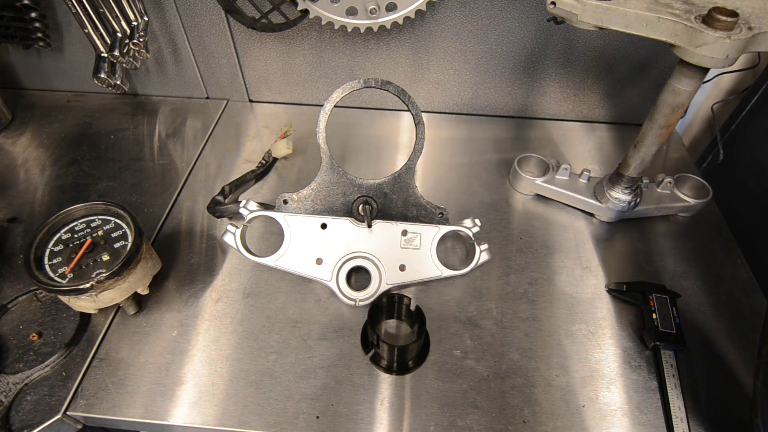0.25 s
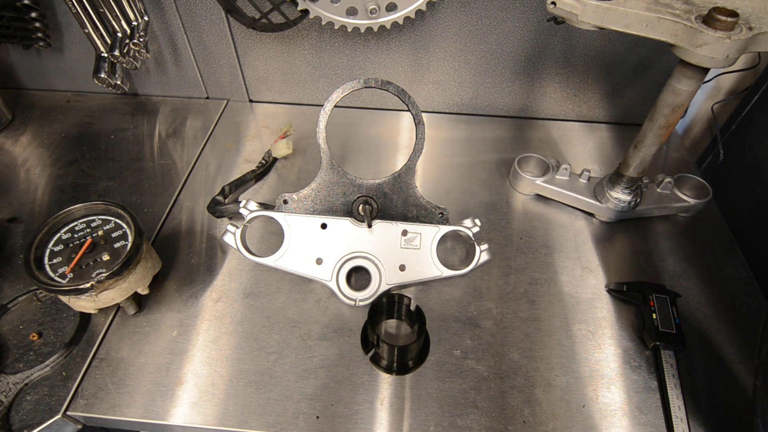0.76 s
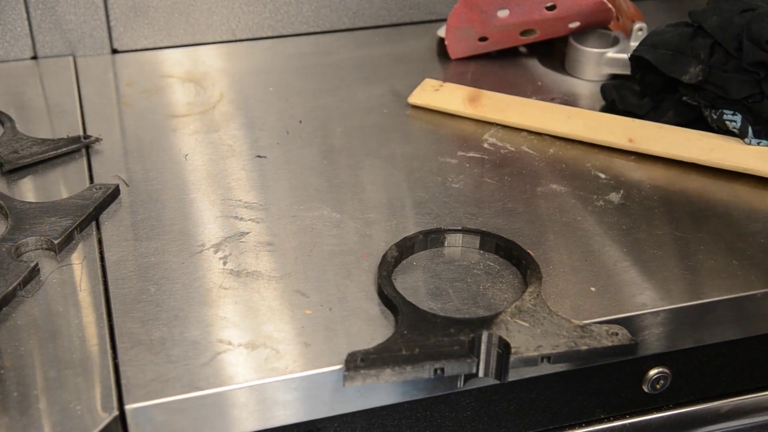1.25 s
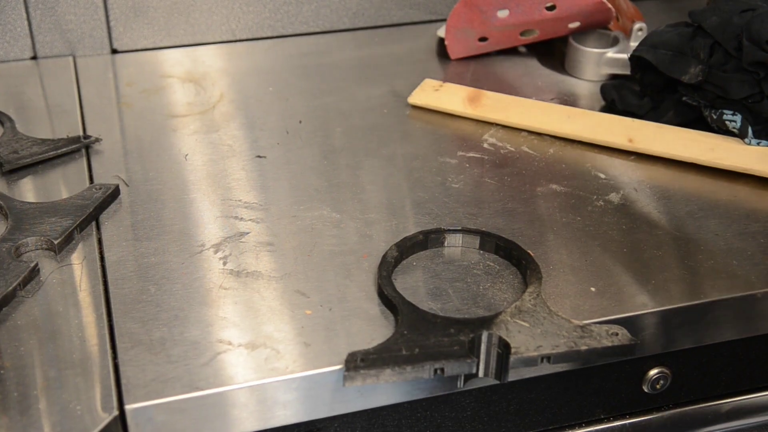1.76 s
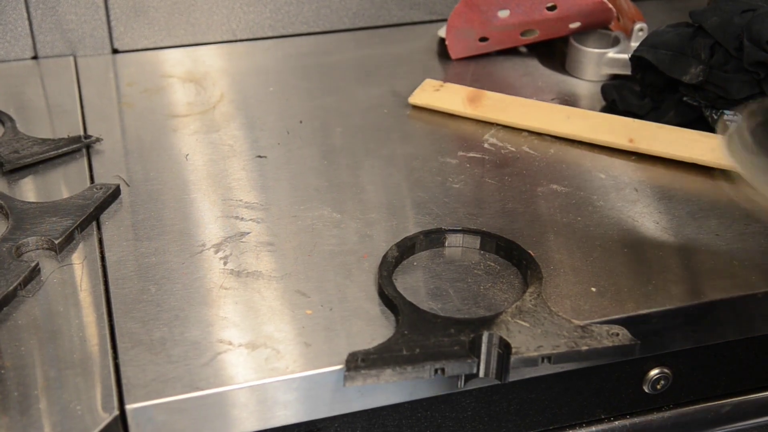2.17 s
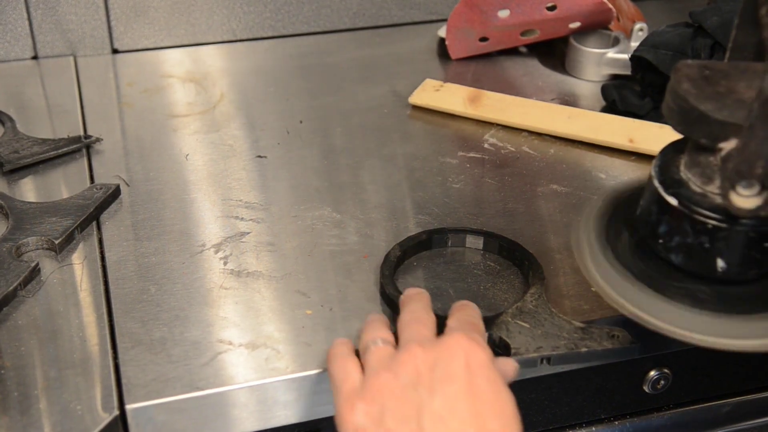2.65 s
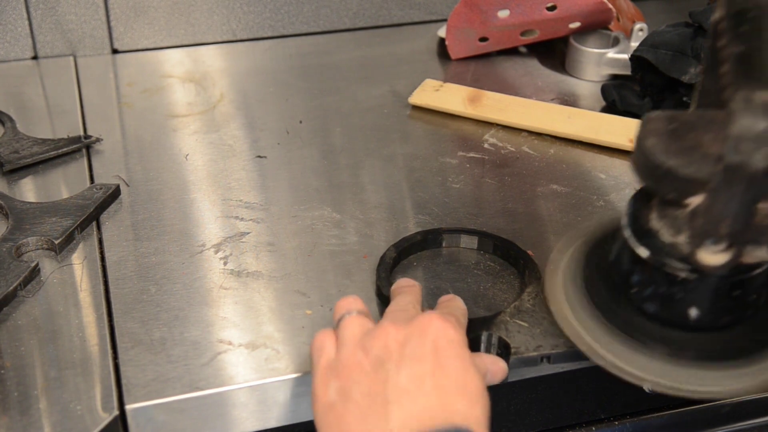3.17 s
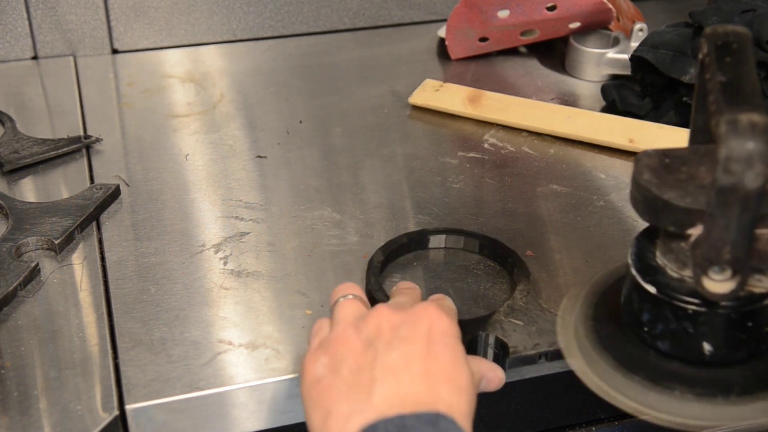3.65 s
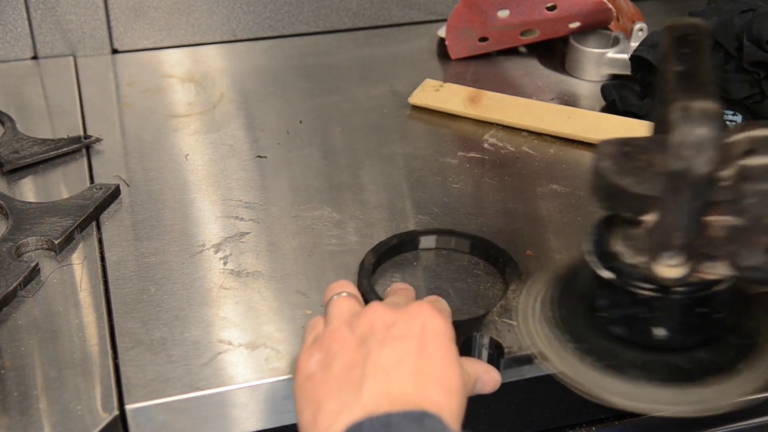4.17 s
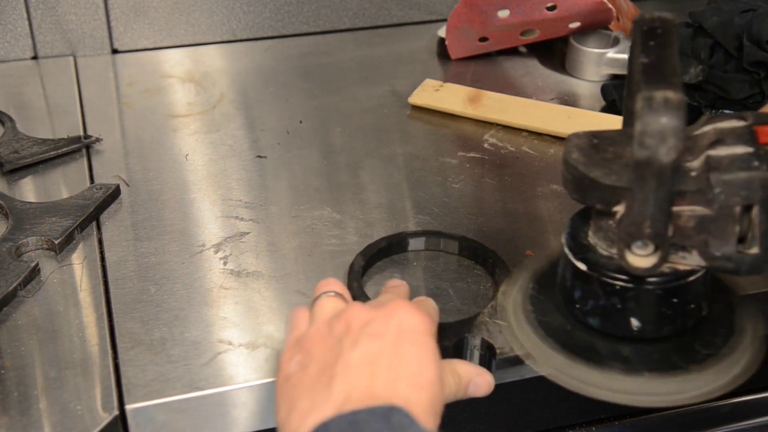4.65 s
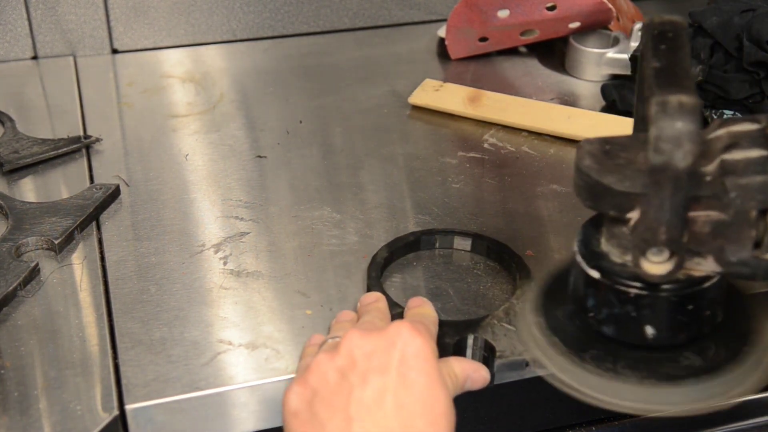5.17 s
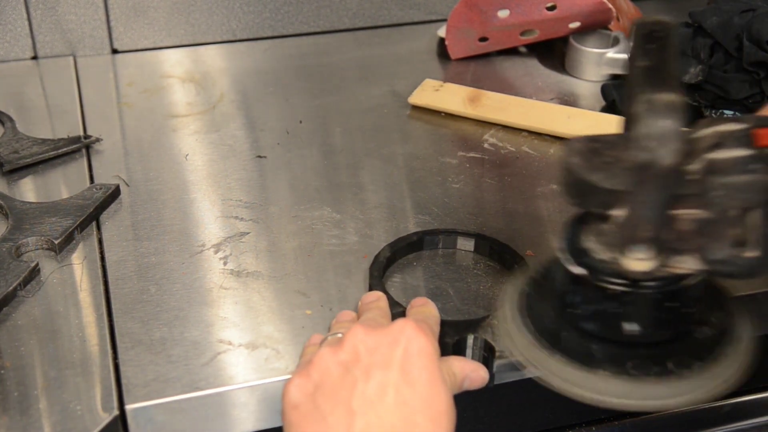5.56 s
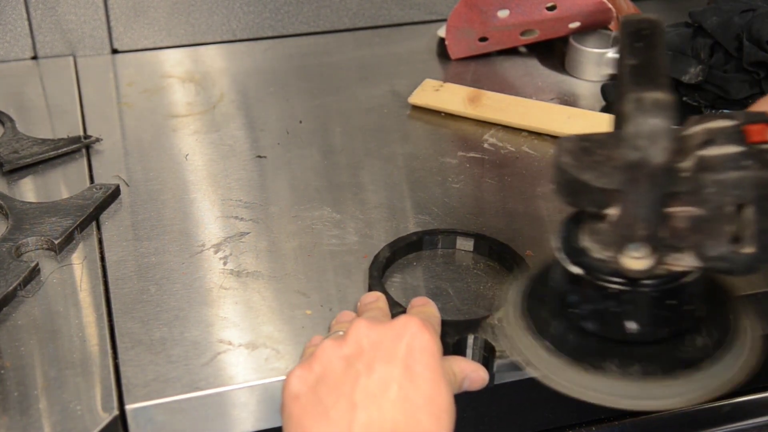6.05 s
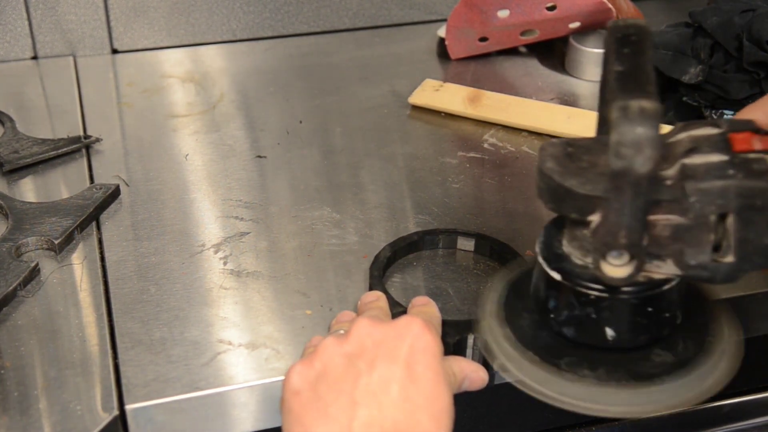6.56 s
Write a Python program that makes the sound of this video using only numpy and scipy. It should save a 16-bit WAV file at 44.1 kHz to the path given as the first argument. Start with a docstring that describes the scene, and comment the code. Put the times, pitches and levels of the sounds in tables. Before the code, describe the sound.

Near silence with faint room tone and a small clack, then a few knocks as an electric sander comes in abruptly, turning slowly with a coarse gear rattle. Heavy thuds on the steel bench follow while its whine and hiss climb to full speed. The disc then scrapes a plastic part, drumming through the bench, and the motor dips slightly as it is pressed harder. Close microphone, small hard workshop.

```python
"""Over faint room tone a geared electric disc sander is knocked about on a steel bench: thuds and clacks.
It comes in abruptly, already turning slowly: random tooth strikes ring the housing, with whine, whistle, hiss.
Near full speed the rattle throbs with each turn of the disc, and the disc's unbalance hums.
Set against a plastic part, the disc scrapes (shaped noise) and drums bench and part (tones locked to its turn).
At last the hand leans on the tool: the motor sags and the drumming moves from the bench into the part."""
import sys
import numpy as np
from scipy import signal
from scipy.fft import rfft, irfft
from scipy.io import wavfile
from scipy.ndimage import uniform_filter1d

SR = 44100
rng = np.random.default_rng(int(sys.argv[2]) if len(sys.argv) > 2 else 0)


def transcribe(signal):
    """Save signal, clipped to [-1, 1], as a 16-bit WAV file at the path in sys.argv[1]."""
    frames = np.atleast_2d(signal).T
    limited = np.clip(frames, -1, 1)
    pcm = np.round(limited * 32767).astype(np.int16)
    wavfile.write(sys.argv[1], SR, pcm)


N = 300321
TIME = np.arange(N) / SR
PINION_TEETH, WHEEL_TEETH = 12, 45  # the motor shaft carries the pinion, the disc the wheel
ENTRY_S = 0.841  # the sander comes in, already turning slowly
FULL_MESH_HZ = 1965  # teeth meeting per second at the governed speed


def gain_of(db):
    """Decibels to amplitude."""
    return 10 ** (np.asarray(db) / 20)


def evened(x):
    """Scales to rms 1."""
    return x / np.sqrt(np.mean(x ** 2) + 1e-20)


def bump(x, middle, width):
    """A bell of height 1, down to 1/e at one width."""
    return np.exp(-((x - middle) / width) ** 2)


def read(points, hz, column=1):
    """One column of a spectrum on a log-frequency axis."""
    points = np.asarray(points)
    return np.interp(np.log(hz + 1), np.log(points[:, 0]), points[:, column])


def band_rms(x, low_hz, high_hz):
    """Rms of the part of x inside a band."""
    hz = np.fft.rfftfreq(len(x), 1 / SR)
    inside = rfft(x)[(hz > low_hz) & (hz < high_hz)]
    return np.sqrt(2 * np.sum(abs(inside) ** 2)) / len(x)


def noise(colour):
    """Steady noise of a given spectrum, rms 1."""
    hz = np.fft.rfftfreq(N, 1 / SR)
    return evened(irfft(rfft(rng.standard_normal(N)) * gain_of(read(colour, hz)), N))


def wander(rate_hz):
    """Slow chance up to about a rate, rms 1."""
    hz = np.fft.rfftfreq(N, 1 / SR)
    return evened(irfft(rfft(rng.standard_normal(N)) * np.exp(-(hz / rate_hz) ** 2), N))


# room tone spectrum, relative: freq_hz, level_db
ROOM_COLOUR = [(24, -63), (40, -10), (100, -10), (346, -8), (466, -1.5), (627, -8), (710, -7), (1110, -6.5),
               (1490, -10.5), (1730, -8), (1870, -10.5), (2710, -17), (5290, -30), (12600, -38),
               (15000, -39)]


def room_tone(level_db=-61):
    """Steady coloured noise under everything."""
    return gain_of(level_db) * noise(ROOM_COLOUR)


# bench-top thud spectrum, relative: freq_hz, level_db
THUD_COLOUR = [(30, -25), (90, -28), (200, -1), (400, 0), (800, 1), (1500, -2), (4000, -17), (12000, -71)]
# handling knocks, and last the disc striking the part: start_s, thud_db, clack_db, clack_pitch_hz,
# clack_width_octaves, clack_t60_s
KNOCKS = [(0.033, -80, -47.5, 2450, 0.37, 0.032), (0.627, -57, -68, 3500, 0.98, 0.28),
          (0.679, -59, -70, 3500, 0.8, 0.2), (0.839, -42.5, -52, 2900, 0.6, 0.044),
          (0.875, -52, -49, 4990, 0.36, 0.045), (0.912, -42, -46, 5000, 0.31, 0.08),
          (1.254, -25.5, -40, 6200, 0.72, 0.13), (1.287, -40, -54, 3000, 0.8, 0.08),
          (1.338, -26.5, -46, 2500, 0.72, 0.091), (1.385, -36, -51, 2480, 0.8, 0.08),
          (1.431, -39, -37.5, 5400, 0.74, 0.095), (3.446, -51, -40, 9700, 0.39, 0.38)]


def knocks(thud_t60_s=0.31, thud_attack_s=0.0012, clack_attack_s=0.001, size=22050):
    """Each knock is a dull thud of the bench top and a bright, dense clack, both decaying noise."""
    out, t, hz = np.zeros(N), TIME[:size], np.fft.rfftfreq(size, 1 / SR)
    bench = noise(THUD_COLOUR)
    for start_s, thud_db, clack_db, pitch_hz, octaves, clack_t60_s in KNOCKS:
        start = round(start_s * SR)
        span = slice(start, start + size)
        band = np.exp(-.5 * (np.log2((hz + 1) / pitch_hz) / octaves) ** 2)
        clack = evened(irfft(rfft(rng.standard_normal(size)) * band))
        clack_shape = np.exp(-np.log(1000) * t / clack_t60_s) * (1 - np.exp(-t / clack_attack_s))
        thud_shape = np.exp(-np.log(1000) * t / thud_t60_s) * (1 - np.exp(-t / thud_attack_s))
        out[span] += clack * gain_of(clack_db) * clack_shape
        out[span] += bench[span] * gain_of(thud_db) * thud_shape
    return out


def workshop(x, wet_db=-9, t60_s=0.38, gap_s=.003, size=16000):
    """Scattered reflections from the bench and the near walls: sparse random taps that die away."""
    t = TIME[:size]
    sparse = rng.standard_normal(size) * (rng.random(size) < .05)
    taps = sparse * np.exp(-np.log(1000) * t / t60_s) * (t > gap_s)
    wet = gain_of(wet_db)
    echoes = signal.oaconvolve(x, taps / np.linalg.norm(taps))[:N]
    return (x + wet * echoes) / np.sqrt(1 + wet ** 2)


TOUCH_S, SETTLE_S = 3.43, 0.37  # the disc meets the part, then settles onto it


def touching():
    """How fully the disc lies on the part, 0-1."""
    return np.clip((TIME - TOUCH_S) / SETTLE_S, 0, 1)


def leaning(middle_s=5.9, ease_s=0.19):
    """How hard the hand presses down, 0-1: a smooth step."""
    return 1 / (1 + np.exp((middle_s - TIME) / ease_s))


def speed(crawl_hz=250, climb_hz_per_s=740, knee=10, sag_hz=97):
    """Teeth meeting per second: a steady climb rounds off at the governed speed; pressure drags it down."""
    climb = crawl_hz + climb_hz_per_s * np.maximum(TIME - ENTRY_S, 0)
    governed = climb / (1 + (climb / FULL_MESH_HZ) ** knee) ** (1 / knee)
    return governed - sag_hz * leaning()


def decades(mesh_hz):
    """Speed against full speed, in powers of ten."""
    return np.log10(mesh_hz / FULL_MESH_HZ)


def gear_level(mesh_hz, full_db=-21.5, db_per_decade=13.5, unsteady_db=0.65):
    """Gear loudness in dB: rises quickly from its abrupt entry, grows with speed and load, never quite still."""
    free = full_db + db_per_decade * decades(mesh_hz)
    # the gears shake harder while their rate climbs past the housing's main resonances
    free += 2 * bump(mesh_hz, middle=1520, width=110)
    load_rise_s, touch_db, lean_db = 1.0, 1.5, 1
    load = touch_db * np.clip((TIME - TOUCH_S) / load_rise_s, 0, 1) + lean_db * leaning()
    entry_lull = -4 * bump(TIME, ENTRY_S, width=0.043)
    # first contact takes up the play in the gears and calms them for a moment
    calm = -1 * bump(TIME, TOUCH_S + 0.12, width=0.12)
    return free + load + entry_lull + calm + unsteady_db * wander(rate_hz=15)


# housing resonances: centre_hz, width_hz, lift_slow_db, lift_full_speed_db
HOUSING_MODES = [(401, 155, 9.5, 5.1), (506, 7.8, 13, -3), (712, 38, 1.5, 8.5), (1002, 58, -1.5, 7.5),
                 (1201, 210, 12, 9.5), (1326.5, 71, 8, 13), (1446, 24, 6, 3), (1753, 250, 8.5, 13),
                 (2027, 120, 9, 4.5), (2271, 160, 12, 9), (2395, 153, 2.5, 6.5), (2690, 300, 5, 4),
                 (2696, 500, 7.5, 6), (2860, 42, 1.5, 0), (3244, 200, -2.5, 6.5), (3576, 116, 2, 8),
                 (3790, 205, -1, 9), (4110, 150, -0.5, 6), (4860, 210, 1, 6.5), (5390, 190, 6, 12.5),
                 (5880, 155, 9, 13)]
# broad housing colour, relative: freq_hz, level_slow_db, level_full_speed_db
HOUSING_COLOUR = [(30, -38, -75), (80, -37, -39), (145, -37, -28), (202, -19, -24), (354, -15.5, -17),
                  (604, -11.5, -7), (960, -6, -9), (1457, -4, -6), (2500, -19.5, -12), (3230, -14, -15.5),
                  (4500, -17.5, -15), (5450, -30, -29.5), (7230, -34.5, -29), (10000, -45, -53),
                  (15000, -52, -62)]


def housing(x, column, size=8192):
    """Rings the housing: a minimum-phase filter of broad colour plus resonances, rms 1 in 1-3 kHz."""
    hz = np.fft.rfftfreq(size, 1 / SR)
    db = read(HOUSING_COLOUR, hz, column)
    for mode in HOUSING_MODES:
        centre_hz, width_hz, lift_db = mode[0], mode[1], mode[1 + column]
        db = db + lift_db / (1 + (2 * (hz - centre_hz) / width_hz) ** 2)
    # folding the cepstrum makes the filter causal
    cepstrum = irfft(np.log(gain_of(db)))
    cepstrum[1:size // 2] *= 2
    cepstrum[size // 2 + 1:] = 0
    response = irfft(np.exp(rfft(cepstrum)))[:size // 2]
    rung = signal.oaconvolve(x, response)[:N]
    return rung / band_rms(rung, 1000, 3000)


def throb(teeth, disc_db, shaft_db, current_db, current_hz=100):
    """Load on the teeth in dB: swings with the disc, the motor shaft and the pulsing mains current."""
    disc = disc_db * np.cos(2 * np.pi * teeth / WHEEL_TEETH)
    shaft = shaft_db * np.cos(2 * np.pi * teeth / PINION_TEETH)
    return disc + shaft + current_db * np.cos(2 * np.pi * current_hz * TIME)


def backlash(teeth, settle_s=0.0048, scatter_s=.002, slap_share=.7, slap_size=1.55):
    """On some shaft turns the teeth slap across their play, hardest where the disc runs heavy."""
    at = np.flatnonzero(np.diff(teeth // PINION_TEETH))
    size, happens, late = rng.random((3, len(at)))
    heavy = 1 + np.cos(2 * np.pi * teeth[at] / WHEEL_TEETH)
    slaps = np.zeros(N)
    slap_at = (at + late * SR * scatter_s).astype(int).clip(0, N - 1)
    slaps[slap_at] = (happens < slap_share) * slap_size * size * heavy
    return signal.lfilter([1], [1, -np.exp(-1 / (settle_s * SR))], slaps)


# gear chatter bursts: middle_s, lift_db, half_length_s
CHATTER_BURSTS = [(0.95, 1, 0.018), (1.064, 6, 0.005), (1.367, 2.2, 0.099), (2.227, 4, 0.036),
                  (2.55, 2, 0.016), (2.898, 8.5, 0.003), (3.397, 3, 0.019), (4.27, 3, 0.008),
                  (5.302, 11, 0.0035), (5.613, 2.5, 0.014), (5.902, 1.5, 0.02), (5.943, 3, 0.009),
                  (6.347, 1.5, 0.0078)]


def rattle(teeth, mesh_hz, gear_db, grind=0.73, slow_grind=1.77, slow_throb=0.1):
    """Each tooth strikes within its play; faster gears throb harder and wake the higher resonances."""
    count = int(teeth[-1])
    play, side = rng.random((2, count))
    fast = np.interp(mesh_hz, [1000, 1850], [0, 1])
    at = np.searchsorted(teeth, np.arange(count) + play).clip(0, N - 1)
    strikes = np.zeros(N)
    strikes[at] = np.sign(side - .5) / np.sqrt(mesh_hz[at])
    sliding = slow_grind + (grind - slow_grind) * fast  # slow teeth slide more than they strike
    drive = evened(strikes) + sliding * rng.standard_normal(N)
    depth = np.interp(mesh_hz, [700, 1700], [slow_throb, 1])
    drive *= gain_of(depth * throb(teeth, disc_db=1.34, shaft_db=0.65, current_db=1.0))
    drive *= 1 + depth * backlash(teeth)
    drive /= np.sqrt(uniform_filter1d(drive ** 2, size=2000) + 1e-12)  # the same power in every few turns
    drive *= gain_of(sum(db * bump(TIME, s, half_s) for s, db, half_s in CHATTER_BURSTS))
    rung = (1 - fast) * housing(drive, column=1) + fast * housing(drive, column=2)
    return rung * gain_of(gear_db)


def idle_ring(x, mesh_hz, ring_hz=1255, width_hz=190, ring_db=-3.0, share=0.25):
    """At a crawl the soft blows lean towards the gear case's main resonance."""
    ring = signal.lfilter(*signal.iirpeak(ring_hz, ring_hz / width_hz, fs=SR), x)
    crawl = share * np.interp(mesh_hz, [550, 1000], [1, 0])
    return (1 - crawl) * x + crawl * gain_of(ring_db) * ring


def air_level(mesh_hz, full_db=-45, db_per_decade=31, touch_db=1.4):
    """Reference level in dB for hiss and whistle: grows steeply with speed, lifts on the part."""
    return full_db + db_per_decade * decades(mesh_hz) + touch_db * touching()


# hiss spectrum, relative: freq_hz, level_db
AIR_COLOUR = [(1000, -30), (4000, 1.5), (6500, 5.5), (8000, 5), (10000, 1), (13000, -13), (15500, -22)]


def air(teeth, mesh_hz, hiss_db=-3):
    """Hiss of the cooling fan and the brushes: noise throbbing with the load."""
    hiss = noise(AIR_COLOUR) * gain_of(throb(teeth, disc_db=1.5, shaft_db=3.0, current_db=0.7))
    return hiss / band_rms(hiss, 6500, 12000) * gain_of(air_level(mesh_hz) + hiss_db)


def shaft_tone(teeth, order, waver_db, smear_rad):
    """A wavering tone locked to the motor shaft."""
    phase = 2 * np.pi * order * teeth / PINION_TEETH + smear_rad * wander(rate_hz=90)
    return gain_of(waver_db * wander(rate_hz=6)) * np.cos(phase)


# whine ahead of the housing, relative: shaft_multiple, level_db
WHINE_TONES = [(3, -2.5), (7, -20), (8, -4), (9, -8.5), (10, -7), (11, 3.5), (12, 5.5), (14, -25), (22, 1)]


def whine(teeth, mesh_hz, gear_db, whine_db=-8.5, idle_db=-10):
    """The gears' tones swell one after another as they climb through the housing's resonances."""
    tones = sum(gain_of(db) * shaft_tone(teeth, order, waver_db=1, smear_rad=0.27)
                for order, db in WHINE_TONES)
    slow_db = np.interp(mesh_hz, [600, 1200], [idle_db, 0])
    return housing(tones, column=2) * gain_of(gear_db + whine_db + slow_db)


# thin whistle above the whine, relative: shaft_multiple, level_db
WHISTLE_TONES = [(48, -14), (60, -11), (72, -10.5), (84, -14), (96, -15), (104, -15), (112, -14)]
# how well the vents let the whistle out: freq_hz, gain_db
VENTS = [(2000, -10), (5000, 1), (8000, 0), (10000, -2), (11700, -5), (13500, -13.5), (15500, -28)]


def whistle(teeth, mesh_hz, free_db=1.4, touch_db=-1.6):
    """High overtones climb through the vents' range; they stand out most while the disc spins free."""
    shaft_hz = mesh_hz / PINION_TEETH
    tones = np.zeros(N)
    for order, db in WHISTLE_TONES:
        vented = gain_of(db + read(VENTS, order * shaft_hz))
        tones += vented * shaft_tone(teeth, order, waver_db=2.0, smear_rad=.95)
    return tones * gain_of(air_level(mesh_hz) + free_db + touch_db * touching())


def unbalance(teeth, mesh_hz, full_db=-67, db_per_decade=60):
    """The off-centre disc hums once a turn when it nears full speed."""
    hum = np.sqrt(2) * np.sin(2 * np.pi * teeth / WHEEL_TEETH)
    return hum * gain_of(full_db + db_per_decade * decades(mesh_hz))


# scrape spectrum, relative: freq_hz, level_db
SCRAPE_COLOUR = [(60, -46), (140, -13), (220, -12.5), (350, -5.5), (550, -1), (900, -1), (1500, 1),
                 (4000, -46), (8000, -33), (12000, -34.5), (15500, -45)]


def scrape(turns, level_db=-34, lean_db=0.7, bite_db=-1.5):
    """Grit scrapes the plastic: noise that bites once a turn."""
    grit = noise(SCRAPE_COLOUR) * gain_of(bite_db * np.cos(2 * np.pi * turns) + 0.5 * wander(rate_hz=280))
    return grit / band_rms(grit, 280, 650) * np.sqrt(touching()) * gain_of(level_db + lean_db * leaning())


def drum(turns, orders, waver_db=2.5):
    """The uneven disc shoves what it touches once a turn: wavering harmonics of the turn, rms 1."""
    tones = np.zeros(N)
    for order, db in orders:
        swell = gain_of(db + waver_db * wander(rate_hz=12.0))
        tones += swell * np.cos(2 * np.pi * (order * turns + rng.random()))
    return evened(tones)


# bench drumming, relative: disc_turn_multiple, level_db
BENCH_DRUM = [(1, -17), (2, 2), (3, 5.5)]
# plastic part drumming, relative: disc_turn_multiple, level_db
PART_DRUM = [(4, 5.5), (5, 9.5), (6, 2.5), (7, -4), (8, 4.5), (9, -2), (12, -9)]


def sanding(teeth, rock_db=1.76):
    """Scrape and drumming swell as the tool rocks in the hand; pressure moves drumming into the part."""
    turns, touch, lean = teeth / WHEEL_TEETH, touching(), leaning()
    bench = drum(turns, BENCH_DRUM) * gain_of(-42 - 9 * lean) * touch ** 2
    part = drum(turns, PART_DRUM) * gain_of(-40 + 6 * lean) * touch
    return (scrape(turns) + bench + part) * gain_of(rock_db * wander(rate_hz=2.0))


def scene():
    """One speed drives every part of the sander; only rattle, air and knocks get reflections."""
    mesh_hz = speed() * (1 + .0008 * wander(rate_hz=12))
    teeth = np.cumsum(mesh_hz) / SR  # running count of teeth
    gear_db = gear_level(mesh_hz)
    heard = TIME > ENTRY_S
    gears = idle_ring(rattle(teeth, mesh_hz, gear_db), mesh_hz)
    machine = (gears + air(teeth, mesh_hz)) * heard
    tones = whine(teeth, mesh_hz, gear_db) + whistle(teeth, mesh_hz) + unbalance(teeth, mesh_hz)
    mix = room_tone() + workshop(knocks() + machine) + tones * heard + sanding(teeth)
    return mix[None]


def record(dry, edge_hz=15650):
    """Band limit: a linear-phase low-pass."""
    lowpass = signal.firwin(511, edge_hz, window=("kaiser", 9), fs=SR)
    return signal.oaconvolve(dry, lowpass[None], "same")


dry = scene()
out = record(dry)
transcribe(out)
```